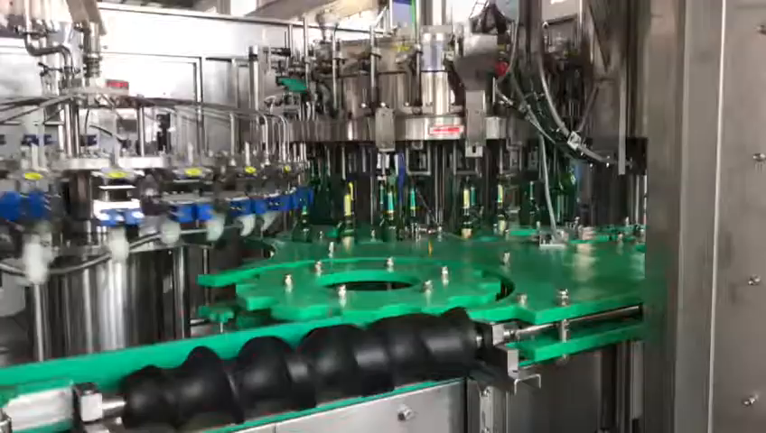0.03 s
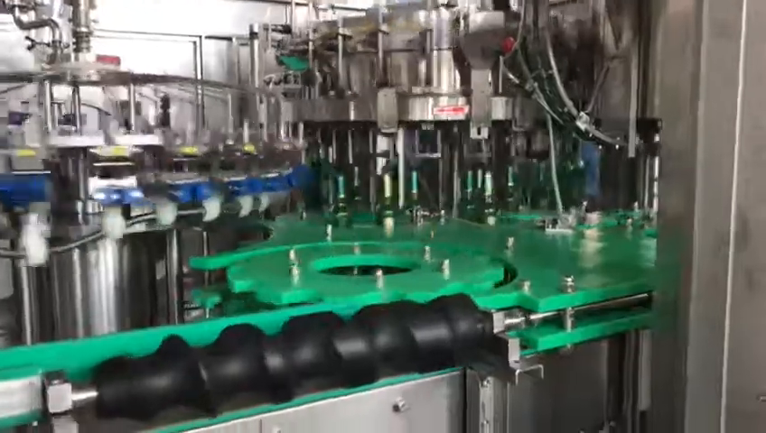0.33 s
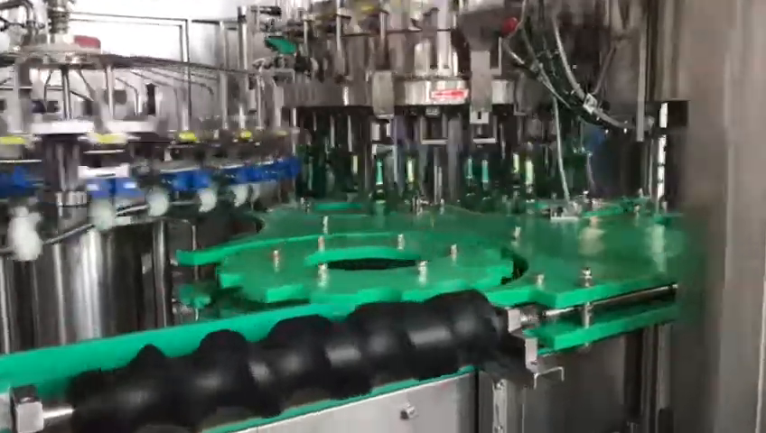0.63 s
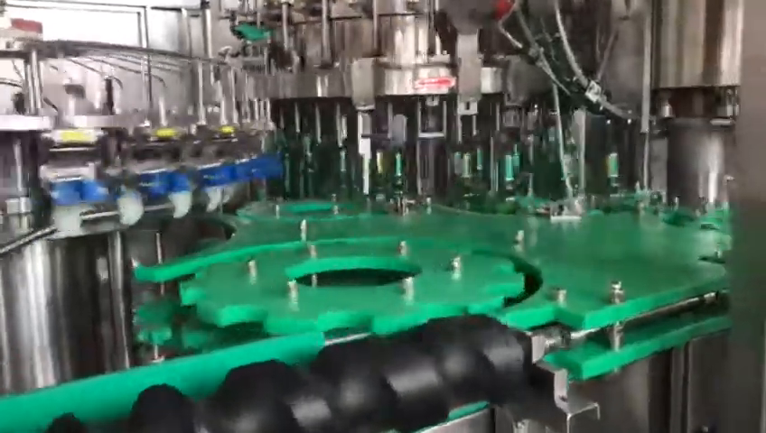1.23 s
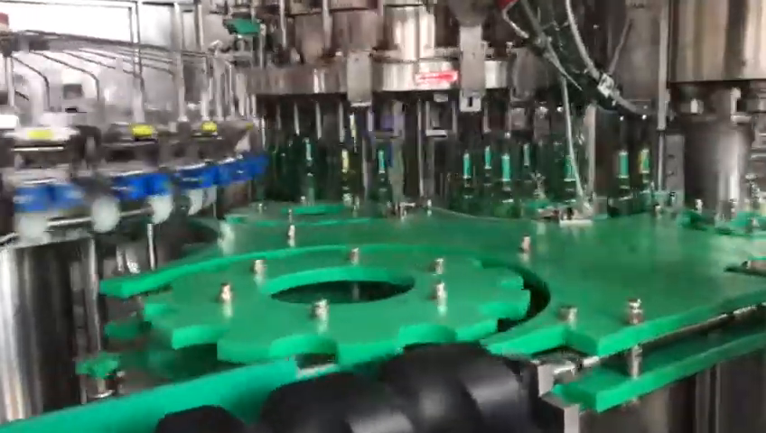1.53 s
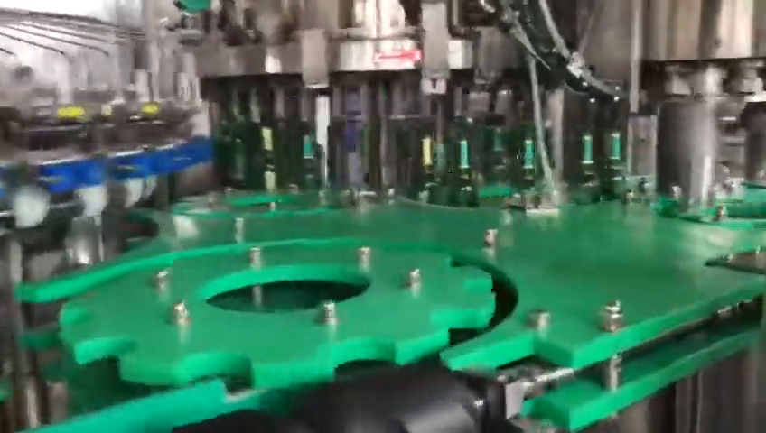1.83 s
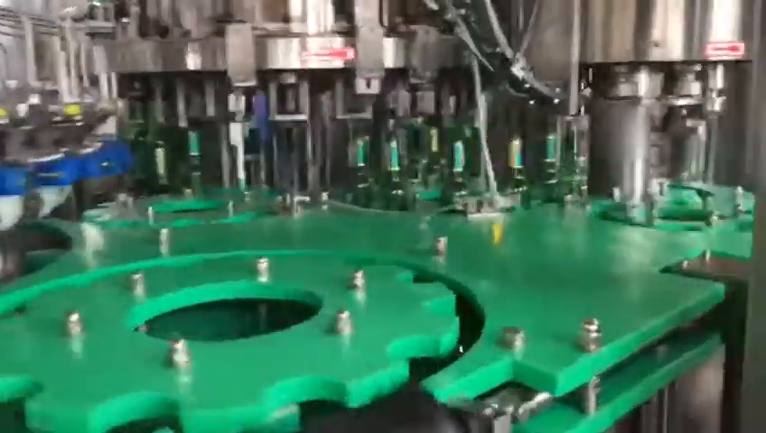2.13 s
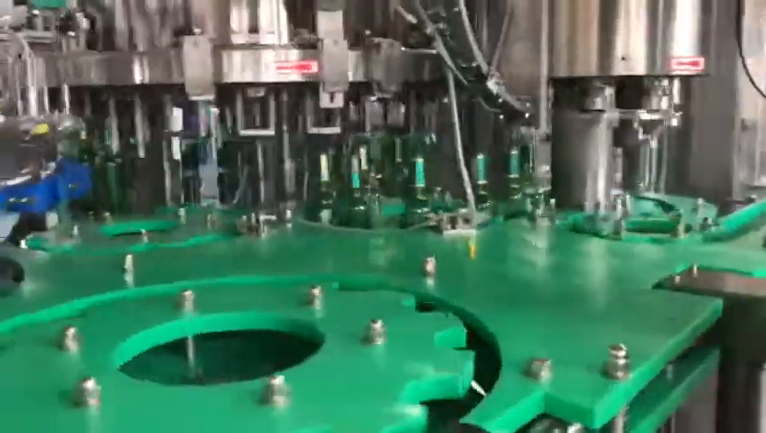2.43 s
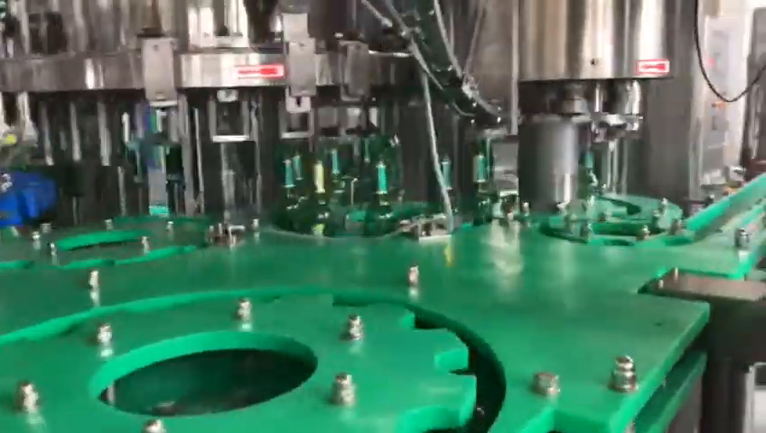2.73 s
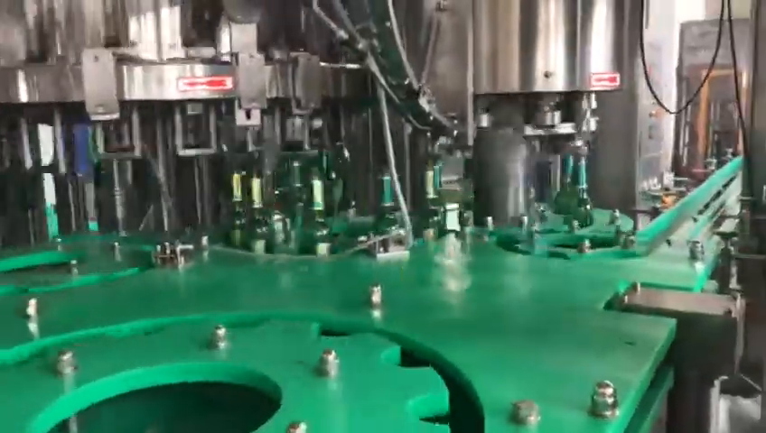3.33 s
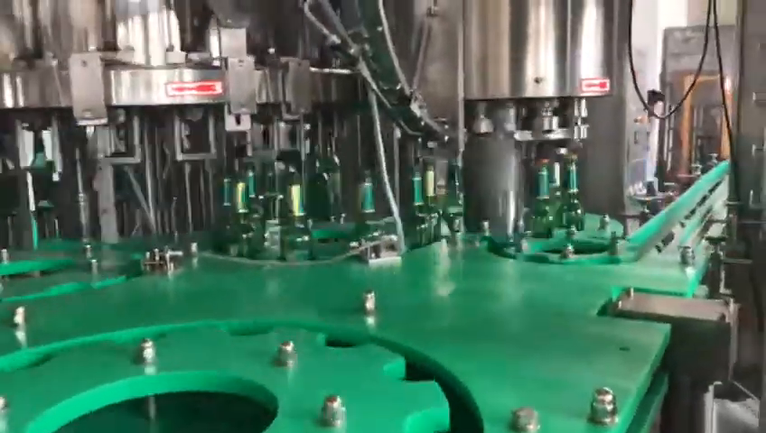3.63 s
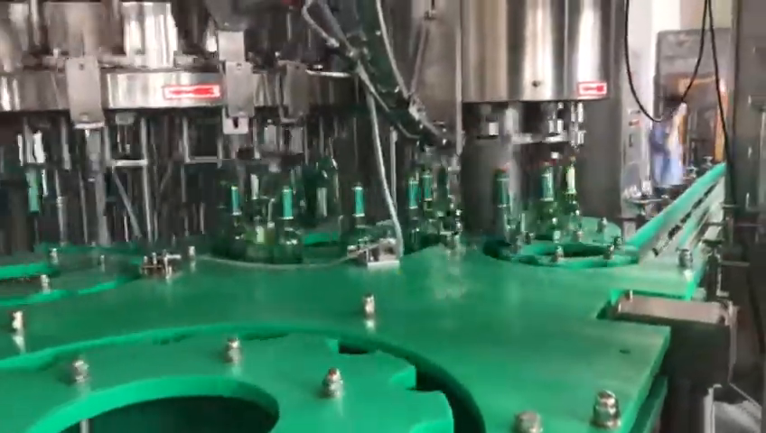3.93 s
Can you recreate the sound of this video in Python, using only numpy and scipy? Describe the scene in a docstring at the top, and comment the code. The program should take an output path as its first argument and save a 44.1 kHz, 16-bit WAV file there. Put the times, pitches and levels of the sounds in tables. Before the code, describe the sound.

A loud, steady hiss of compressed air starts after a second of metallic clacks and three whistling puffs from a bottle filling machine. Regular clacking, rumble and faint glass rattling continue underneath as the microphone approaches in a factory.

```python
"""Bottle filler in a factory hall

A rotary filler clacks about three times a second over rumble, hum and rattling glass.
Its valves give three whistling puffs, then a vent opens and compressed air hisses steadily.
The hiss changes tone as the microphone moves closer, and one bottle judders against a guide.
The hall echoes the knocks and puffs, and an automatic volume control turns loud sound down."""
import sys
import numpy as np
from scipy import signal
from scipy.fft import rfft, irfft, next_fast_len
from scipy.io import wavfile
from scipy.ndimage import uniform_filter1d, map_coordinates

SR = 44100
rng = np.random.default_rng(int(sys.argv[2]) if len(sys.argv) > 2 else 0)


def inscribe(sig):
    """Save sig as 16-bit PCM at rate SR to the path in sys.argv[1].

    A 1-D sig is mono; a 2-D sig holds one channel per row.
    Samples are clipped to [-1, 1] before scaling.
    """
    pcm = np.round(np.clip(np.atleast_2d(sig).T, -1, 1) * 32767)
    wavfile.write(sys.argv[1], SR, pcm.astype(np.int16))


N = 176400

# A colour is a sound's level at each pitch; t60 is the time it takes to fade by 60 dB.
CLACKS = [(.3825, -16.5), (0.7366, -16.5), (1.0839, -16), (1.436, -15.5), (1.779, -16), (2.124, -19),
          (2.482, -19), (2.82, -16.5), (3.173, -18.5), (3.518, -16.5), (3.86, -16)]  # one blow per bottle station: t/s, level/dB
STEEL_COLOUR = [(150, -30), (400, -7), (800, -0.5), (1200, -6), (1800, -1), (2450, 1.5), (4000, -0.5),
                (6500, 0.5), (8500, -3.5), (12000, 0.5), (15500, -11)]  # struck steel parts: f/Hz, level/dB
STEEL_MODES = [(808, 32, -6.5), (2445, 55, 3.5), (3935, 100, 2), (4210, 120, -3), (6220, 99, 1),
               (8100, 76, 0), (8800, 35, -9), (9330, 100, -6), (9700, 110, -8)]  # their ringing tones: f/Hz, width/Hz, level/dB
FRAME_COLOUR = [(150, -16), (450, -2.5), (800, 0.5), (1200, -2), (1700, 0), (2600, 0), (4000, -11),
                (8000, -30)]  # the shaken frame: f/Hz, level/dB
TICKS = [(0.2405, -20.5), (.505, -35), (.5838, -21), (.6612, -25), (0.802, -28.5), (.94, -23), (1.007, -30),
         (1.045, -26), (1.0513, -31)]  # small ticks of valves and glass: t/s, level/dB
TICK_COLOUR = [(1500, -11), (4500, -5), (6400, 1), (9000, 0), (12000, -1), (15500, -4)]  # their bright tone: f/Hz, level/dB

HISS_FAR = [(400, -34), (1500, -17), (2400, -4), (3300, -1), (4000, -4.5), (5000, 1.5), (6600, 1.5),
            (7800, -5.5), (9000, -4.5), (10300, -5.5), (11500, -1), (13000, -1), (15700, -7)]  # the vent from afar: f/Hz, level/dB
HISS_FAR_MODES = [(2450, 330, -8), (4550, 190, 4), (5800, 250, -1), (6600, 200, -7), (11570, 600, -5.5)]  # narrow peaks in that hiss: f/Hz, width/Hz, level/dB
HISS_NEAR = [(400, -30), (1600, -15), (2500, -8.5), (3200, -1.5), (4000, -0.5), (4900, -1.5), (6400, -.5),
             (7800, -9), (9300, -5), (10500, -8), (13200, -1.5), (15700, -8)]  # the vent from close by: f/Hz, level/dB
HISS_DIP = [(1.2, 14000), (1.9, 13700), (2.5, 12600), (2.9, 11700), (4, 10500)]  # a dip in the treble that sinks as the microphone moves: t/s, f/Hz
JET_BAND = [(1.2, 3600, -24), (1.6, 3640, -23), (2.25, 3650, -25), (2.45, 4000, -23.5), (2.67, 3860, -20.5),
            (2.79, 3870, -28), (2.9, 3850, -20.5), (3.12, 3730, -23.5), (3.35, 3700, -19.5),
            (3.48, 3680, -23), (3.7, 3700, -20.5), (3.98, 3720, -20.5)]  # the air jet's main resonance: t/s, f/Hz, relative level/dB
SPRAY_COLOUR = [(2000, -25), (5500, -14), (8500, -3), (10300, -8), (11500, 0), (12800, 7), (13700, -7),
                (15500, -6)]  # the first rush of air: f/Hz, level/dB

PUFFS = [(0.24, -31, 0.056, 3.5), (0.582, -31.5, 0.088, 4), (0.937, -30.5, 0.077, 1)]  # valve puffs: t/s, level/dB, hold/s, whistle above the air/dB
PUFF_COLOUR = [(500, 10), (1500, -4), (3000, 8.5), (5000, 6.5), (7000, 1), (10000, -0.5), (12000, -11),
               (15500, -5)]  # air leaving a valve: f/Hz, level/dB
WHISTLE_MODES = [(4730, 110, -13), (7400, 82, -3.5), (8100, 48, -6), (10800, 56, -8), (11310, 58, 3.5),
                 (11800, 160, 2), (13800, 39, 4), (14800, 36, -5), (15700, 39, 1)]  # tones of the valve's bore: f/Hz, width/Hz, level/dB

JUDDER_MODES = [(333, 70, -2), (410, 60, -2.5), (580, 210, -4), (750, 110, -2.5), (1320, 250, -17),
                (1740, 69, -8), (2600, 160, -16)]  # tones of the juddering bottle: f/Hz, width/Hz, level/dB
CLINKS = [(.2177, 6800, -43, 0.11), (.562, 3650, -34.5, 0.074), (.592, 4540, -31, 0.14),
          (.94, 6330, -17.5, 0.023), (.948, 4660, -35, 0.091), (1.048, 8740, -29, 0.12),
          (1.045, 4010, -34, .18)]  # glass bottles touching: t/s, f/Hz, level/dB, t60/s

RUMBLE_COLOUR = [(25, -55), (40, -25), (60, -6), (90, -3.5), (170, -2.5), (300, -2), (390, -3.5),
                 (500, -10.5), (1250, -12), (1700, -19), (2800, -21), (3900, -21.5), (5000, -27),
                 (9000, -32), (10100, -30), (11200, -37), (13000, -32), (15500, -38)]  # the running machine: f/Hz, level/dB
DRIVE_COLOUR = [(25, -42), (38, -21), (55, -5), (100, 5.5), (160, -3), (400, -24), (2000, -70)]  # the drive under the table: f/Hz, level/dB
HUM_TONES = [(75.4, -46), (172.3, -41.5), (729, -48), (1164, -51)]  # the machine's hum: f/Hz, level/dB
BUMPS = [(.425, -31), (0.784, -23.5), (1.128, -24), (1.25, -29.5), (2.599, -25.5), (2.945, -23),
         (3.66, -25)]  # bumps in the frame: t/s, level/dB
BUMP_COLOUR = [(60, -22), (150, -7), (330, 4.5), (650, -4.5), (1500, -15), (5000, -60)]  # their dull tone: f/Hz, level/dB
HALL_DECAY = [(200, .7), (2000, 0.19), (6000, 0.25), (12000, .16)]  # how long the hall rings: f/Hz, t60/s


def clacks(slide_s=.037):
    """Each station slides, then strikes: steel cracks and rings, and the frame answers. Parts tick."""
    blows = sum(amp(db) * (burst(s, t60=.15) + amp(-.5) * burst(s, t60=.017)) for s, db in CLACKS)
    frame = sum(amp(db - 8) * burst(s, t60=.2, rise=.004) for s, db in CLACKS)
    slides = amp(-35.5) * sum(burst(s - slide_s, t60=slide_s, hold=slide_s, rise=.01) for s, _ in CLACKS)
    ticks = sum(amp(db) * burst(s, t60=.043) for s, db in TICKS)
    steel = ringing(STEEL_COLOUR, STEEL_MODES, ring_db=-8)
    return blows * steel + frame * noise(FRAME_COLOUR) + slides * noise(PUFF_COLOUR) + ticks * noise(TICK_COLOUR)


def vent(open_s=1.151, rise_s=.053, move_s=(2.15, 2.82)):
    """Compressed air escapes with a bright surge, then settles; its tone shifts as we come closer."""
    age = np.maximum(clock() - open_s, 0)
    near = np.interp(clock(), move_s, [0, 1])
    far_hiss = ringing(HISS_FAR, HISS_FAR_MODES, ring_db=-8.5)
    hiss = np.sqrt(1 - near) * far_hiss + np.sqrt(near) * noise(HISS_NEAR)
    hiss = moving_filter(hiss, lambda hz, t: amp(-1.5 * bell_curve(hz, t, HISS_DIP, width_hz=320)))
    surge_db = 1.2 * np.exp(-(age / .15) ** 2)
    hiss = patchy(hiss, depth_db=2.4, bands=3, frames=24) * amp(-13.5 + surge_db)
    times, _, jet_db = np.transpose(JET_BAND)
    jet = moving_filter(rng.standard_normal(N), lambda hz, t: bell_curve(hz, t, JET_BAND, width_hz=605))
    jet = patchy(jet, depth_db=2.4, bands=2, frames=12) * amp(2.5 + np.interp(clock(), times, jet_db))
    spray = amp(-19) * burst(open_s, t60=.5, hold=.08, rise=rise_s) * noise(SPRAY_COLOUR)
    flow = np.minimum(age / rise_s, 1) * amp(.92 * wobble(40))
    return flow * (hiss + jet) + spray


def valve_puffs(scatter_db=2.5):
    """Each valve spurts air and whistles unsteadily, with its own mix of the bore's tones."""
    spurts = sum(amp(db) * burst(s, t60=.24, hold=hold, rise=.0026) for s, db, hold, _ in PUFFS)
    air = spurts * patchy(noise(PUFF_COLOUR), depth_db=3, bands=4, frames=10)
    for s, db, _, above_db in PUFFS:
        modes = [(hz, width, level + scatter_db * rng.standard_normal())
                 for hz, width, level in WHISTLE_MODES]
        whistle = patchy(resonate(rng.standard_normal(N), modes), depth_db=4, bands=8, frames=2)
        air += amp(db + above_db) * burst(s, t60=.14, hold=.047) * whistle
    flutter_db = 1.6 * wobble(109.5) + 2.4 * wobble(500)
    return air * amp(flutter_db)


def bottle_judder(slip_hz=390.2, roughness=.2):
    """A bottle scrapes onto a guide, then sticks and slips; the uneven slips make it ring."""
    slip_count = np.cumsum(slip_hz * np.exp(roughness * wobble(400))) / SR
    slips = np.diff(np.floor(slip_count), prepend=0) * amp(2.2 * wobble(300))  # one click per slip
    groan = amp(-16.5) * burst(2.735, t60=.15, hold=.021, rise=.018) * resonate(slips, JUDDER_MODES)
    scrape = amp(-18) * burst(2.731, t60=.14, rise=.006) * noise(FRAME_COLOUR)
    return groan + scrape


def bottle_clinks(rattles_per_s=45, middle_hz=1091, rattle_t60=.093):
    """Glass clinks nearby, and guides and bottles rattle at random all along the line."""
    when, pitch, strength = rng.random((int(rattles_per_s * N / SR), 3)).T
    octaves = .45 * np.log(pitch / (1 - pitch)).clip(-3, 3)  # most land near the middle pitch
    levels_db = -40 - 3.5 * octaves + 8 * (strength - .5)  # higher rattles are quieter
    rattles = zip(when * N / SR, middle_hz * 2 ** octaves, levels_db)
    glass = np.zeros(N + SR)
    for s, hz, db, t60 in list(CLINKS) + [(*row, rattle_t60) for row in rattles]:
        ring = amp(db) * ping(hz, t60)
        glass[int(s * SR):][:len(ring)] += ring
    return glass[:N] * amp(3.2 * wobble(150))


def machine():
    """The filler rumbles, hums and bumps; its deep drive grows louder as we approach."""
    rumble = amp(-28.5) * patchy(noise(RUMBLE_COLOUR), depth_db=2.5, bands=3, frames=6)
    drive = amp(np.linspace(-39, -31, N)) * noise(DRIVE_COLOUR)
    hum = sum(amp(db) * np.sqrt(2) * np.sin(2 * np.pi * hz * clock() + .98 * wobble(12))
              for hz, db in HUM_TONES)
    bumps = sum(amp(db) * burst(s, t60=.23, rise=.008) for s, db in BUMPS) * noise(BUMP_COLOUR)
    return rumble + drive + hum + bumps


def hall_echo(x):
    """The hall throws the sound back; low notes linger longest."""
    hz, t, spectrum = signal.stft(rng.standard_normal(SR // 2), SR, nperseg=256)
    fade = amp(-60 * t / along(HALL_DECAY, hz)[:, None])
    tail = signal.istft(spectrum * fade, SR, nperseg=256)[1]
    return signal.fftconvolve(x, tail / np.linalg.norm(tail))[:N]


def amp(db):
    """Turn decibels into a multiplier."""
    return 10 ** (np.asarray(db) / 20)


def unit(x):
    """Scale to an average (rms) level of 1."""
    return x / np.sqrt(np.mean(x ** 2) + 1e-20)


def along(points, hz):
    """Read between (f/Hz, value) points on a pitch scale."""
    freqs, values = np.transpose(points)
    return np.interp(np.log(hz + 1), np.log(freqs + 1), values)


def clock():
    """The time of each sample in seconds."""
    return np.arange(N) / SR


def wobble(rate):
    """A smooth curve through `rate` random values a second."""
    return map_coordinates(rng.standard_normal(int(N * rate / SR) + 4), [clock() * rate])


def burst(start, t60, hold=0, rise=.0004):
    """A loudness shape: rise, hold, then die away (all in seconds)."""
    t = clock() - start
    return np.clip(t / rise, 0, 1) * amp(-60 * np.maximum(t - rise - hold, 0) / t60)


def ping(hz, t60):
    """One fading pure tone."""
    t = np.arange(SR // 3) / SR
    return np.sqrt(2) * np.sin(2 * np.pi * hz * t) * amp(-60 * t / t60)


def filtered(x, gain):
    """Scale each frequency in x by gain(hz)."""
    size = next_fast_len(N + SR // 2)
    return irfft(rfft(x, size) * gain(np.fft.rfftfreq(size, 1 / SR)), size)[:N]


def noise(colour):
    """Noise with the given colour."""
    return unit(filtered(rng.standard_normal(N), lambda hz: amp(along(colour, hz))))


def resonate(x, modes):
    """Let x ring at each of the given tones."""
    def gain(f):
        return sum(amp(db) * 1j * f * width / (hz * hz - f * f + 1j * f * width)
                   for hz, width, db in modes)
    return unit(filtered(x, gain))


def ringing(colour, modes, ring_db):
    """Coloured noise with ringing tones standing out of it."""
    return unit(noise(colour) + amp(ring_db) * resonate(rng.standard_normal(N), modes))


def patchy(x, depth_db, bands, frames):
    """Vary the level in random patches, `bands` wide in pitch and `frames` long in time."""
    spectrum = signal.stft(x, nperseg=1024)[2]
    patches = uniform_filter1d(rng.standard_normal(spectrum.shape), bands, axis=0)
    patches = uniform_filter1d(patches, frames, axis=1)
    return unit(signal.istft(spectrum * amp(depth_db * unit(patches)), nperseg=1024)[1][:N])


def moving_filter(x, gain):
    """A filter that changes with time, set by gain(hz, t)."""
    hz, t, spectrum = signal.stft(x, SR, nperseg=1024)
    return signal.istft(spectrum * gain(hz[:, None], t), SR, nperseg=1024)[1][:N]


def bell_curve(hz, t, path, width_hz):
    """A smooth hump whose centre follows (t/s, f/Hz) points."""
    times, centres = np.transpose(path)[:2]
    return np.exp(-((hz - np.interp(t, times, centres)) / width_hz) ** 2)


def scene():
    """Everything reaches one microphone, alike in both channels."""
    short_sounds = clacks() + valve_puffs() + bottle_judder() + bottle_clinks()
    mono = machine() + vent() + short_sounds + amp(-10) * hall_echo(short_sounds)
    return np.array([mono, mono])


def record(dry):
    """After a brief silence, loud sound is slowly turned down and the highest treble is cut."""
    threshold_db, cut_per_db, react_s = -22, .54, .35
    start_s, peak_limit, top_hz = .121, .61, 15850
    level_db = 10 * np.log10(np.abs(uniform_filter1d(dry[0] ** 2, size=1024)) + 1e-12)
    excess_db = np.maximum(level_db - threshold_db, 0)
    smoothing = np.exp(-1 / (react_s * SR))
    cut_db = signal.lfilter([1 - smoothing], [1, -smoothing], cut_per_db * excess_db)
    x = dry * amp(-cut_db) * (clock() > start_s)
    x = x / (1 + (x / peak_limit) ** 6) ** (1 / 6)  # round off the peaks
    return np.array([filtered(channel, lambda hz: hz < top_hz) for channel in x])


dry = scene()
out = record(dry)
inscribe(out)
```